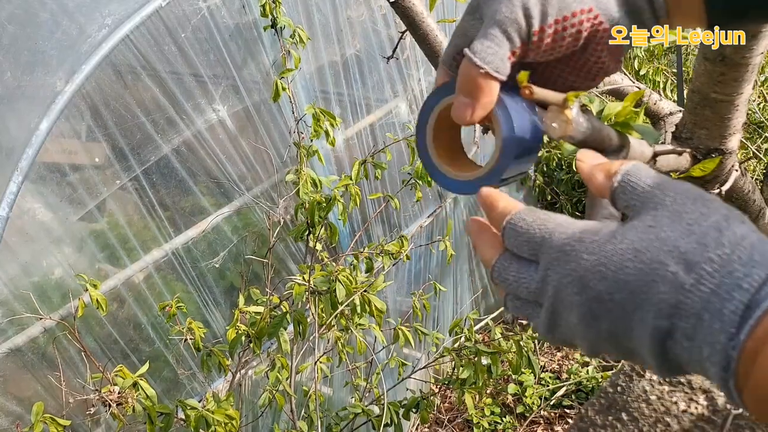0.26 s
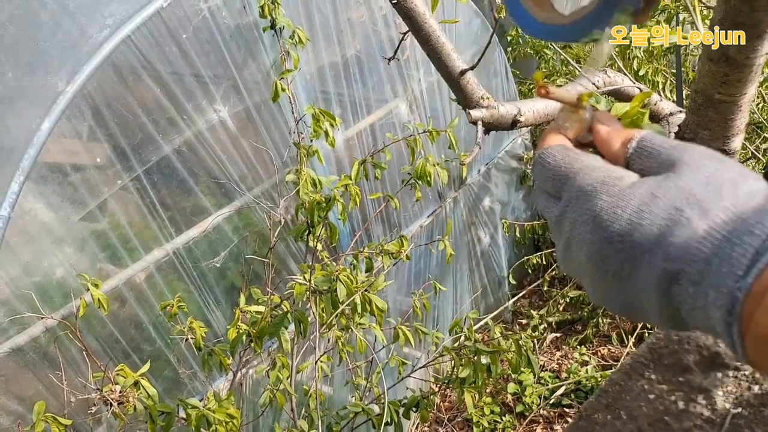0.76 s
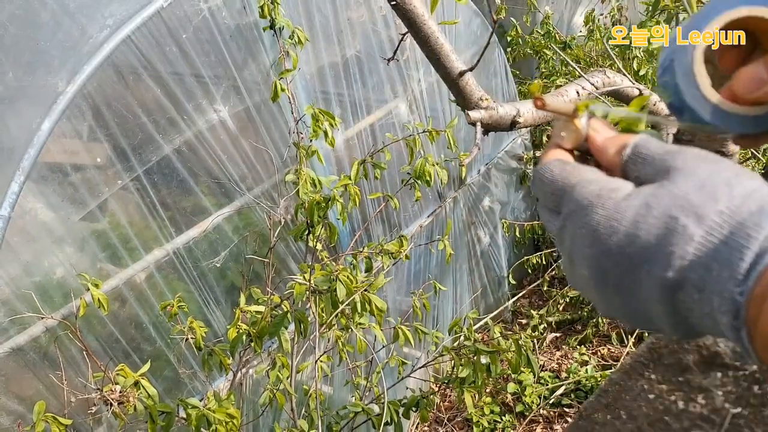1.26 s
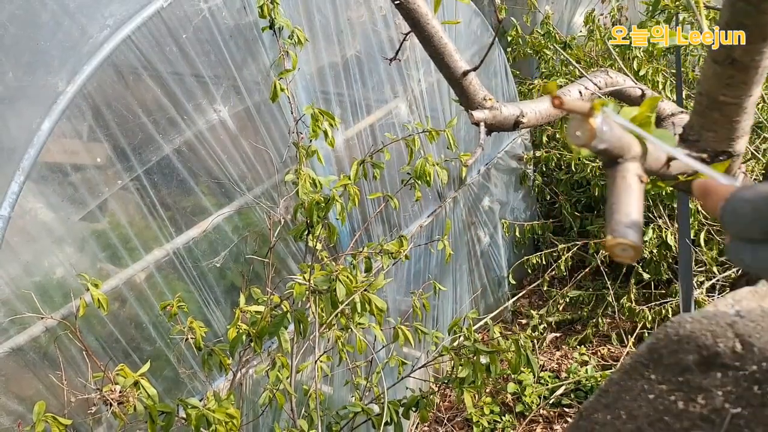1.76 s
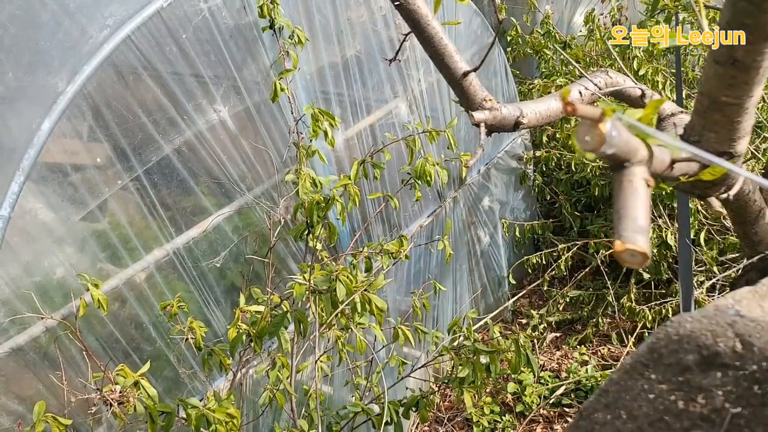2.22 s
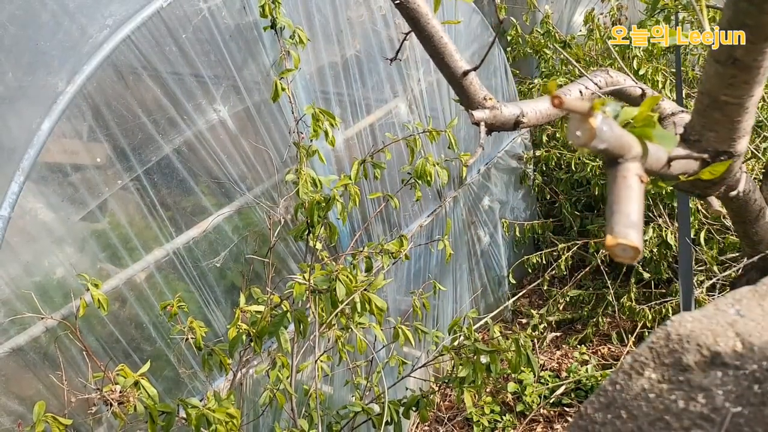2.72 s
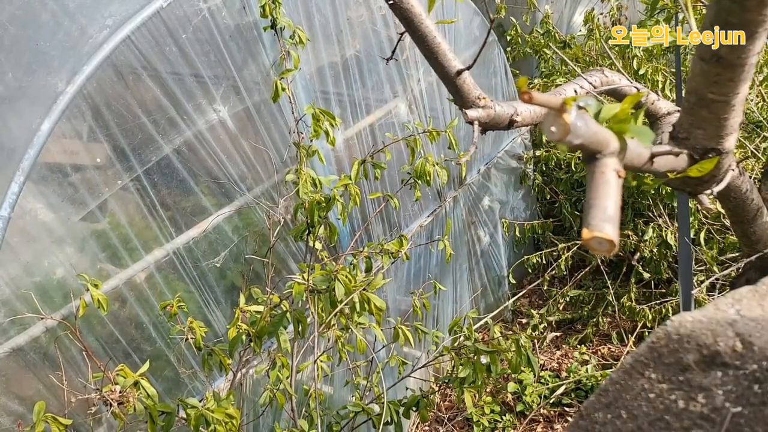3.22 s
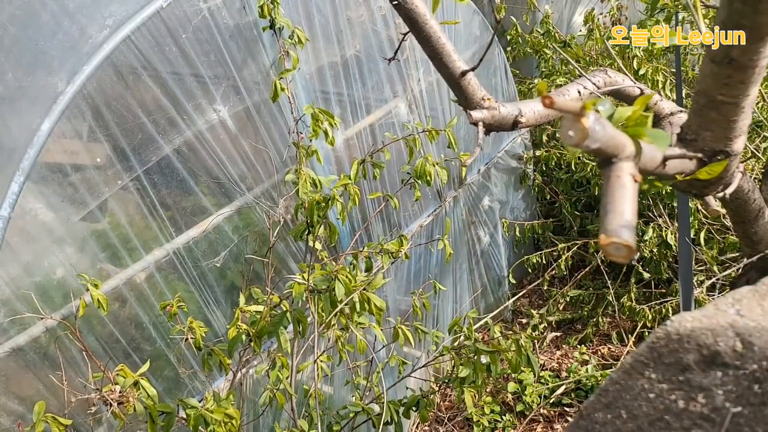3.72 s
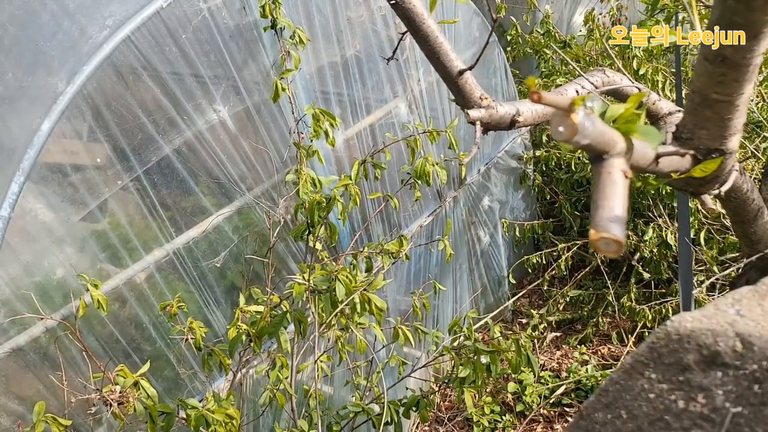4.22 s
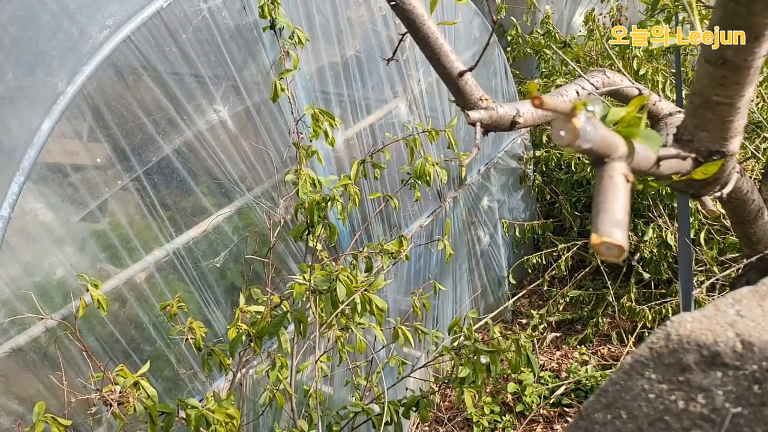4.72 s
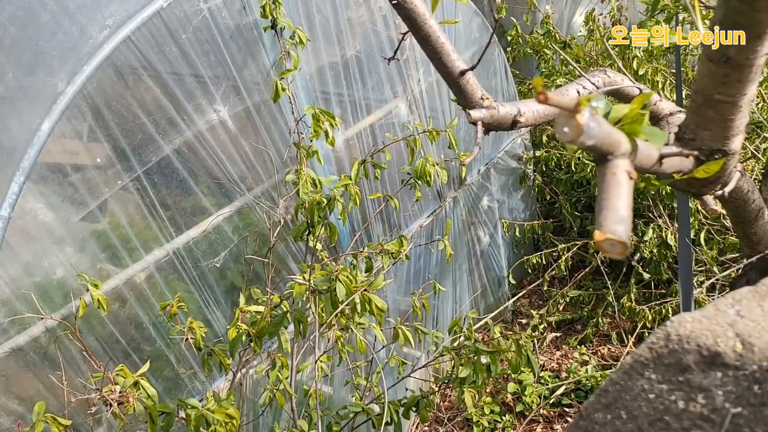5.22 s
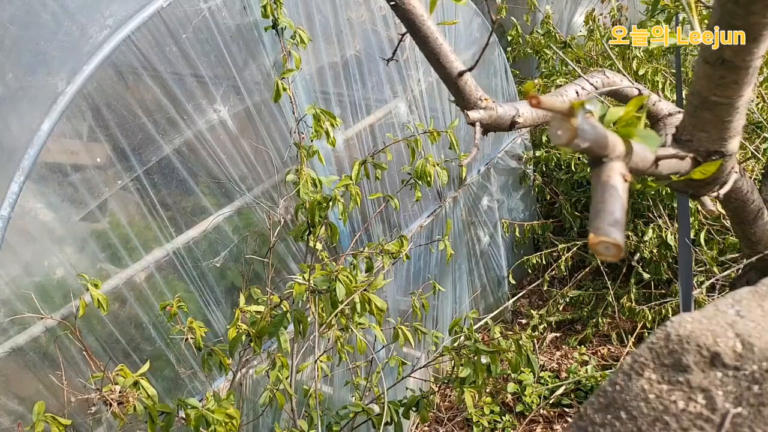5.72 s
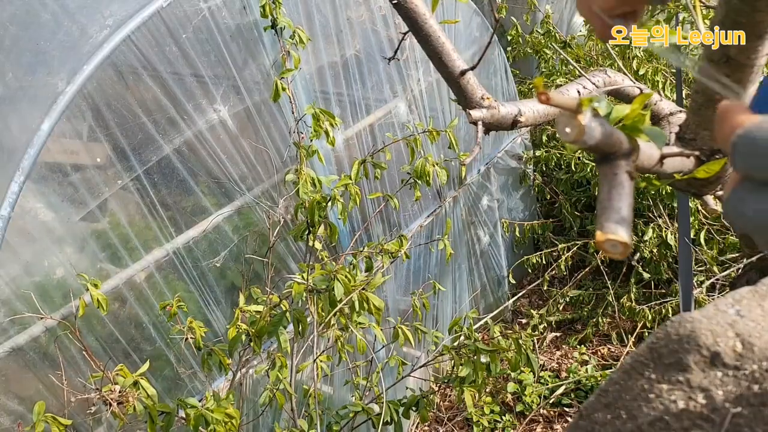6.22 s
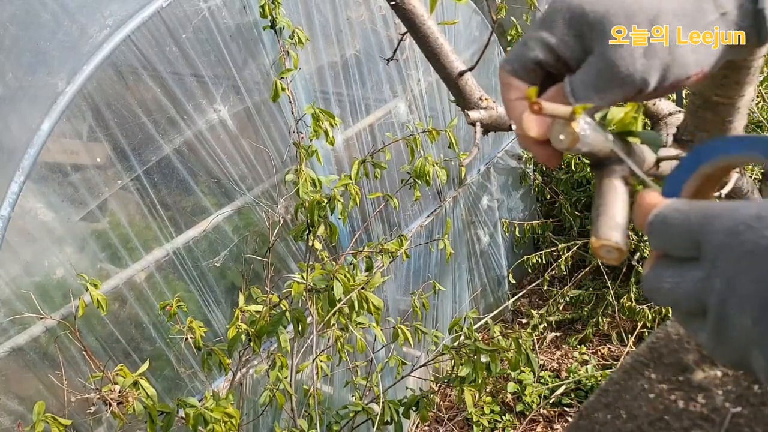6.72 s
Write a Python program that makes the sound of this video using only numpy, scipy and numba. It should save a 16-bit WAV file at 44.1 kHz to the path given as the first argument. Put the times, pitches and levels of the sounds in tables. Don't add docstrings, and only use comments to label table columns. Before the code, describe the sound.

Close to a stereo microphone, leaning right, sticky plastic tape is tugged off a roll: light rustles, springy plucks, then a longer crackling pull with falling pitch and crisp film ticks. A quiet stretch leaves faint rustles and birds over soft open air and distant low hum. A dense fast peel follows, ending in hollow cardboard taps and tiny crinkles.

```python
import sys
import numpy as np
from scipy import signal
from scipy.io import wavfile
from scipy.ndimage import uniform_filter1d, map_coordinates
from numba import njit

SR = 44100
rng = np.random.default_rng(int(sys.argv[2]) if len(sys.argv) > 2 else 0)


def decibels_to_gain(level_db):
    exponent = np.asarray(level_db, float) / 20
    return 10 ** exponent


def output_pcm(signal):
    pcm = np.clip(np.atleast_2d(signal).T, -1, 1) * 32767
    wavfile.write(sys.argv[1], SR, np.round(pcm).astype(np.int16))


N = 307377
LEAD_S = 0.006


def columns(table):
    seconds, *rest = np.transpose(table)
    return [np.interp(np.arange(N) / SR, seconds, column) for column in rest]


def unit(x):
    return x / np.sqrt(np.mean(x ** 2) + 1e-30)


def peak(x, db):
    return x * decibels_to_gain(db) / np.abs(x).max()


@njit
def svf(x, hz, width):
    y, b, l, g, last = np.empty(len(x)), 0., 0., 0., 0.
    for i in range(len(x)):
        if hz[i] != last:
            g, last = np.tan(np.pi * hz[i] / SR), hz[i]
        k = width[i] / last
        v = (b + g * (x[i] - l)) / (1 + g * (g + k))
        b, l, y[i] = 2 * v - b, l + 2 * g * v, k * v
    return y


def band(x, hz, width):
    one = np.ones(len(x))
    return svf(x + 1e-18, np.clip(hz * one, 15, 0.45 * SR), width * one)


def both(x, hz, width):
    return np.array([band(band(channel, hz, width), hz, 2 * width) for channel in x])


def above(x, hz):
    return signal.sosfilt(signal.butter(4, hz, "high", fs=SR, output="sos"), x)


def ring(x, hz, t60):
    pole = np.exp((2j * np.pi * hz - np.log(1000) / t60) / SR)
    return signal.lfilter([1], [1, -pole], x).imag


def walk(rate):
    hold = int(SR / rate)
    steps = np.repeat(rng.standard_normal(N // hold + 1), hold)
    return 1.25 * uniform_filter1d(uniform_filter1d(steps, hold), hold)[:N]


def pair(size, scatter_db, same=0.55):
    shared, left, right = rng.standard_normal((3, size))
    grain = decibels_to_gain(scatter_db * np.minimum(rng.exponential(size=size), 4))
    return grain * (np.sqrt(same) * shared + np.sqrt(1 - same) * np.array([left, right]))


def swell(start, end, start_db, end_db):
    size = int((end - start) * SR)
    return decibels_to_gain(np.linspace(start_db, end_db, size)) * signal.windows.tukey(size, min(1100 / size, 1))


def add(out, s, sound):
    i = int(s * SR)
    out[:, i:i + sound.shape[1]] += sound[:, :N - i]


def tear(size, rise_s, fall_s):
    t = np.arange(size) / SR - LEAD_S
    lead_in = np.exp(t / rise_s) + decibels_to_gain(-21) * np.exp(t / 0.003)
    settle = np.exp(-t / fall_s) + decibels_to_gain(-25) * np.exp(-t / 0.006)
    burst = pair(size, scatter_db=2.5, same=0.7) * np.where(t > 0, settle, lead_in)
    burst[:, int(LEAD_S * SR)] = decibels_to_gain(13)
    return burst


def slips():
    # start in seconds, peak level in dB, then strand level in dB against it,
    # roll resonance in Hz, crack level in dB against the peak.
    first_tug = [
        (0.627, -12.5, -18.5, 1079, -4),
        (0.6455, -17.5, -7.5, 950, 5.5),
    ]
    short_strand = [
        (0.785, -8.5, -11, 2170, -3),
        (0.807, -9, -11.5, 2200, -11.5),
        (0.83, -11, -8, 2200, -8.5),
        (0.847, -16.5, -8.5, 2317, -4.5),
    ]
    tight_strand = [
        (1.358, -14, -10, 2270, -2),
        (1.383, -7, -12.5, 2200, -9),
        (1.417, -8.5, -42, 1980, -9),
    ]
    let_go = [
        (2.599, -30.5, -24.5, 1860, 2.5),
        (2.6163, -28.5, -10, 2510, 18.3),
        (2.6167, -30, -28, 3500, 10.8),
        (2.6213, -17, -29, 3080, 2.9),
    ]
    long_strand = [(1.673, -13.5, -26.5, 1260, -16), (1.706, -11, -26, 1164, -11.5),
                   (1.731, -12, -34, 1180, -40), (1.7485, -32, -8, 1190, -1.5), (1.752, -33, -13, 1510, 5),
                   (1.763, -23, -30, 1090, -3.5), (1.776, -26, -12, 1030, -12),
                   (1.805, -20, -12, 1230, -2.5), (1.846, -15.5, -16.5, 1064, -8.5),
                   (1.878, -13.5, -23, 1296, -8.5), (1.894, -26, -21, 1150, -2),
                   (1.911, -19, -15, 1150, -9), (1.927, -16.5, -19.5, 1130, -9.5),
                   (1.95, -15.5, -20, 1160, -12.5), (1.9744, -14.5, -43, 1230, -7),
                   (2.001, -20, -37, 1140, -3.5)]
    last_pull = [(5.4957, -25, -32, 2500, -15), (5.5009, -22.5, -20, 2500, -33),
                 (5.5056, -13.5, -30, 1800, -27), (5.508, -10.5, -26, 1870, -36),
                 (5.511, -31, -36, 2670, -25), (5.535, -16, -41, 2680, -29), (5.556, -26.5, -18, 2800, -2),
                 (5.592, -24, -20, 2820, -14), (5.679, -26, -26, 2360, -12), (5.737, -24, -34, 3300, -13),
                 (5.748, -28, -35, 2600, -5), (5.756, -24, -25, 2200, -7), (5.773, -23.5, -28, 2020, -1),
                 (5.79, -21.5, -29, 1730, -6), (5.8, -32.5, -28, 2400, -13), (5.5404, -24, -14, 2600, -11),
                 (5.562, -29, -28, 2730, 3), (5.568, -13, -32, 2710, -16), (5.576, -15, -33, 2500, -33),
                 (5.63, -14, -32, 1580, -14), (5.643, -13.5, -32, 1900, -14), (5.66, -33, -24, 3000, -4),
                 (5.665, -14.5, -35, 2760, -18), (5.692, -24, -31, 2300, 0.5), (5.7002, -22, -23, 2060, -7),
                 (5.714, -23, -19, 2400, -10), (5.732, -24, -19.5, 3310, -11),
                 (5.765, -22, -22.5, 2500, -11), (5.783, -20.5, -30, 2000, -2.5),
                 (5.7835, -18.5, -27, 2210, 1), (5.794, -17, -39, 1940, -15),
                 (5.829, -32.5, -20, 2500, -12), (5.836, -27.5, -31.5, 2250, -10),
                 (6.031, -31.5, -57, 3090, -27)]
    bumps = [(1.4187, -20, -9.5, 856, -32.5), (2.168, -33, -19.5, 1150, -43),
             (2.616, -27, -11.5, 1340, -39.5), (5.862, -31, -26, 745, -41), (5.875, -26, -23, 750, -33),
             (5.904, -29.5, -31, 745, -34), (5.918, -42, -29, 740, -20), (6.357, -44, -4.5, 870, -33),
             (6.369, -42.5, -16, 986, -25), (6.38, -41, -18, 1000, -20), (6.398, -46, -5, 816, -35)]
    pulls = (first_tug, short_strand, tight_strand, let_go, long_strand, last_pull, bumps)
    # strand pitch at the first slip in Hz, growth of its length in shares per second,
    # ring time in seconds, level step from one overtone to the next in dB.
    pitches, growths = (869, 739.7, 1240, 1150, 629.4, 264, 374.3), (2.1, 0.35, 6.6, 4.1, 2.96, 1.06, 0.29)
    ring_times, overtone_steps = (0.036, 0.055, 0.028, 0.023, 0.053, 0.023, 0.0067), (-13.5, -2.2, -11.5, -22.5, -9, 2.5, 2)
    # roll resonance width as a share of its centre, crack centre in Hz,
    # strand level on the left in dB (it sounds mostly to the right).
    widths, crack_centres, left_levels = (0.32, 0.88, 1, 0.49, 0.54, 0.38, 0.23), (5000, 5000, 5000, 9500, 4000, 4000, 5000), (-3.5, -3, -2, -0.5, -21, -3,
                                                                                -8)
    # multiple of the lowest roll resonance, level in dB.
    roll_modes = [
        (1.002, 3.5),
        (1.648, 0),
        (2.4, -3.5),
        (3.5, -10.5),
    ]
    out = np.zeros((2, N))
    settings = zip(pulls, pitches, growths, ring_times, overtone_steps, widths, crack_centres, left_levels)
    for rows, first_hz, growth, ring_s, step_db, width, crack_hz, left_db in settings:
        for s, db, strand_db, roll_hz, crack_db in rows:
            strand_hz = first_hz / (1 + growth * (s - rows[0][0]))
            burst = tear(size=4400, rise_s=0.0003, fall_s=0.0013)
            strand = 0
            for k in range(3):
                hz = strand_hz * (k + 1) * 1.012 ** k
                tone = band(ring(burst[0], hz, ring_s / 1.2 ** k), hz, 0.49 * hz)
                strand = strand + peak(tone, step_db * k ** 1.1)
            lap = np.zeros(int(SR / strand_hz) + 1)
            lap[0], lap[-1] = 1, -0.34
            burst = signal.lfilter([1], lap, burst)
            roll = sum(decibels_to_gain(mode_db) * both(burst, k * roll_hz, width * roll_hz) for k, mode_db in roll_modes)
            crack = both(burst, crack_hz, width=18000)
            sound = peak(strand, db + strand_db) * decibels_to_gain(np.array([[left_db], [0]]))
            sound = sound + peak(roll, db - 6.5) + peak(crack, db + crack_db)
            add(out, s + 0.0012 - LEAD_S, above(sound, 0.34 * min(strand_hz, roll_hz)))
    return out


def crackle():
    # start and end in seconds, start and end level in dB, centre in Hz.
    peeling = [(0.478, 0.563, -70.5, -48, 4700), (0.634, 0.694, -71, -64, 2980),
               (0.843, 0.903, -44, -80, 3020), (1.412, 1.514, -59, -82, 2740), (1.731, 1.8, -46, -45, 2100),
               (1.998, 2.043, -67, -96, 2900), (2.408, 2.465, -81, -46, 3320),
               (5.424, 5.51, -77.5, -54.5, 3600), (5.502, 5.61, -42.5, -39, 2370),
               (5.6, 5.687, -55, -43.5, 2030), (5.684, 5.794, -44.5, -41, 2500),
               (5.795, 5.86, -55, -58.5, 2290), (5.861, 5.961, -62.5, -71.5, 1954),
               (5.948, 5.993, -62, -76.5, 2297), (2.59, 2.618, -56.5, -47, 4000),
               (0.58, 0.626, -74, -68, 4000), (1.656, 1.73, -71, -68, 2500), (6.002, 6.1, -68.5, -71, 2410)]
    rubbing = [(0.033, 0.103, -65, -68, 7900), (0.198, 0.274, -64.5, -62, 4870),
               (0.402, 0.501, -65, -75, 4570), (1.283, 1.364, -70, -49, 8800),
               (2.17, 2.233, -88, -73, 5200), (2.636, 2.717, -77, -82, 6300),
               (3.463, 3.486, -80, -73, 6160), (3.611, 3.673, -89.5, -77, 4510),
               (3.769, 3.899, -98, -51, 7200), (3.938, 3.99, -69.5, -48, 3186),
               (3.778, 4.085, -70, -82.5, 2480), (4.763, 4.779, -77.5, -81, 6130),
               (5.176, 5.206, -83.5, -74, 6000), (5.356, 5.433, -58.5, -72.5, 5200),
               (6.597, 6.706, -74, -78, 5000)]
    # start and end in seconds, start and end level in dB,
    # start pitch in Hz.
    strand_hum = [(0.22, 0.271, -56.5, -64, 2030), (0.402, 0.436, -57, -63, 2000),
                  (0.463, 0.533, -66.5, -56, 1680), (0.525, 0.594, -47, -64, 1215),
                  (1.734, 1.809, -50.5, -50, 477), (5.514, 5.619, -49.5, -62.5, 450),
                  (5.549, 5.627, -42.5, -42.5, 1520), (5.688, 5.804, -44.5, -43, 1680),
                  (5.692, 5.816, -61.5, -58, 348), (5.861, 5.935, -51, -51.5, 251),
                  (5.862, 5.895, -51, -48.5, 773), (6.358, 6.409, -71, -68.5, 497),
                  (5.912, 5.934, -41, -55.5, 798)]
    # start and end in seconds, start and end level in dB, pitch in Hz.
    after_ring = [
        (0.864, 0.957, -60, -68, 735),
        (0.866, .95, -65, -72, 2260),
    ]
    out = np.zeros((2, N))
    clusters = decibels_to_gain(3 * walk(450) + 1.2 * walk(110))
    for start, end, start_db, end_db, hz in peeling + rubbing:
        top_db = np.clip(14 * np.log2(hz / 5200), -11, 4)
        level = swell(start, end, start_db, end_db)
        grains = pair(len(level), scatter_db=4.5) * clusters[int(start * SR):][:len(level)]
        film = both(grains, hz, 0.95 * hz) + decibels_to_gain(-9) * both(grains, hz=5900, width=1800)
        top = above(both(grains, hz=12000, width=12000), hz=7000)
        add(out, start, level * (unit(above(film, 0.49 * hz)) + decibels_to_gain(top_db) * unit(top)))
    for start, end, start_db, end_db, start_hz in strand_hum:
        level = swell(start, end, start_db, end_db)
        hz = start_hz / (1 + 1.96 * np.arange(len(level)) / SR)
        grains = pair(len(level), scatter_db=-0.5)
        add(out, start, level * unit(both(grains, hz, 0.21 * hz)))
    for start, end, start_db, end_db, hz in after_ring:
        level = swell(start, end, start_db, end_db)
        grains = pair(len(level), scatter_db=-4.5)
        add(out, start, level * unit(both(grains, hz, 0.04 * hz)))
    return out


def ticks():
    # start in seconds, peak level in dB, centre in Hz.
    creases = [(0.1658, -43, 2840), (0.216, -28.5, 4060), (0.2536, -38, 4830), (0.282, -43, 4020),
               (0.4104, -30, 5670), (0.4288, -42, 4020), (0.4495, -53, 3500), (0.47, -42, 6000),
               (0.487, -48, 4500), (0.533, -32.5, 5000), (0.546, -32, 6000), (5.886, -44, 5500),
               (5.906, -44, 4010), (0.2218, -39, 7500), (0.5538, -25.5, 3830), (0.5708, -26.5, 8400),
               (2.118, -40, 5000), (2.14, -29, 5500), (2.145, -30, 4260), (2.158, -16, 5070),
               (2.4546, -46, 5940), (2.7245, -46.5, 3930), (3.434, -53, 5430), (3.7536, -37.5, 7850),
               (3.7765, -39.5, 6000), (3.825, -42, 7000), (3.9583, -41, 3560), (3.971, -34, 3200),
               (4.0694, -48, 6000), (5.1897, -47, 3540), (5.373, -35, 5570), (5.877, -30.5, 5200),
               (6.0734, -35, 3160), (6.093, -48.5, 3570), (6.2028, -39, 2700)]
    flicks = [(0.95, -56, 2500), (0.975, -54, 2680), (2.13, -33.5, 5100), (2.149, -23, 2640),
              (2.172, -13, 6150), (2.426, -46, 3080), (2.589, -47, 6000), (2.71, -41.5, 2500),
              (2.794, -52.5, 5000), (3.1992, -54, 5960), (3.659, -53, 3330), (3.808, -52, 2680),
              (3.842, -39, 7100), (3.85, -43, 7340), (3.864, -36.5, 6720), (3.874, -28.5, 7500),
              (3.8891, -26, 4550), (3.9712, -31, 6000), (4.0098, -39, 7160), (4.018, -43, 6900),
              (4.057, -47, 4580), (4.689, -58, 3730), (4.888, -41, 6940), (5.357, -34, 5870),
              (5.434, -41.5, 5900), (6.185, -50, 5720), (6.3895, -36.5, 6500), (6.42, -49.5, 4200),
              (6.771, -46.5, 5650), (6.8498, -43, 8100),
              (6.372, -52, 6000),
        (6.399, -41.5, 6000),
        (6.541, -43.5, 5000),
        (6.617, -68, 7000),
        (6.636, -55, 6100),
        (6.656, -43, 5950),
        (6.679, -50.5, 7160),
        (6.775, -47.5, 7430),
        (6.845, -44, 7560),
        (6.893, -47, 8000),
    ]
    out = np.zeros((2, N))
    for rows, top_db in ((creases, -14.5), (flicks, -6.5)):
        for s, db, hz in rows:
            burst = above(tear(size=2000, rise_s=0.0007, fall_s=0.001), hz=1500)
            body = both(burst, hz, 1.2 * hz)
            top = both(burst, hz=12000, width=10000)
            add(out, s + 0.00016 - LEAD_S, peak(body, db - 8) + peak(top, db + top_db))
    return out


def taps():
    # start in seconds, peak level in dB.
    hits = [
        (5.9349, -21.5),
        (5.9378, -24.5),
        (5.9438, -10),
        (5.9468, -13),
        (5.9494, -27.5),
        (5.9592, -46.5),
    ]
    # core resonance in Hz, level in dB, ring time in seconds.
    core_modes = [
        (1400, -17.5, .014),
        (2200, 3.5, 0.005),
        (2600, -2.5, 0.0045),
        (3450, -11, 0.0073),
        (6000, -5, 0.0096),
        (10600, -11, 0.0071),
    ]
    out = np.zeros((2, N))
    for s, db in hits:
        push = tear(size=3000, rise_s=0.0005, fall_s=0.002) * decibels_to_gain(-30)
        push[:, int(LEAD_S * SR):][:, :13] -= np.hanning(15)[1:-1]
        core = sum(decibels_to_gain(mode_db) * ring(push, hz, t60) for hz, mode_db, t60 in core_modes)
        add(out, s - LEAD_S, peak(above(core, hz=950), db))
    return out


def whistles():
    # start in seconds, level in dB, length in seconds, tuning factor, hoarseness from 0 to 1.
    calls = [
        (1.039, -48, 0.1, 1.035, .02),
        (4.267, -48.5, 0.1, 1.04, 0),
        (6.179, -50, 0.11, 1.03, 0.5),
    ]
    # share of its length, gliding voice in Hz, its level in dB, steady voice in Hz,
    # its level in dB, trill from 0 to 1.
    course = [
        (0, 3750, -30, 5000, -34, .05),
        (.06, 3800, -11, 5000, -17, .05),
        (.24, 4450, -10, 5050, -15, .15),
        (.33, 4400, -7, 4950, -16, .8),
        (.47, 4050, 1.5, 4850, -18, .95),
        (.57, 3550, -9, 4800, -14, .7),
        (.76, 3400, -5, 4750, -15, .95),
        (.82, 2550, -11, 4700, -26, .4),
        (.96, 2350, -12, 4700, -30, .3),
        (1.001, 2350, -30, 4700, -40, .1),
    ]
    out = np.zeros((2, N))
    for s, db, length, tuning, hoarse in calls:
        share = np.arange(int(length * SR)) / (length * SR)
        at, *shape = np.transpose(course)
        glide_hz, glide_db, steady_hz, steady_db, trill = (np.interp(share, at, c) for c in shape)
        trill = np.maximum(trill, hoarse)
        wobble = unit(band(rng.standard_normal(len(share)), hz=429, width=110))
        glide = 2 * np.pi * np.cumsum(tuning * glide_hz * (1 + 0.075 * trill * wobble)) / SR
        steady = 2 * np.pi * np.cumsum(steady_hz * (1 + 0.018 * (0.3 + trill) * wobble)) / SR
        halves = decibels_to_gain(-13.5) * (np.sin(glide / 2) + np.sin(steady / 2) + np.sin(steady + steady / 2))
        upper_tone = decibels_to_gain(-0.5) * np.sin(steady + steady / 4 + (0.7 + 0.94 * trill) * wobble)
        voice = decibels_to_gain(glide_db) * np.sin(glide) + decibels_to_gain(steady_db) * (np.sin(steady) + halves + upper_tone)
        voice = decibels_to_gain(db) * voice
        add(out, s, np.tile(voice, (2, 1)))
        add(out, s + 0.092, decibels_to_gain(-14.5) * both([voice, voice], hz=4550, width=700))
    return out


def sparrow():
    # start in seconds, level in dB, length in seconds, beak tuning factor, hoarseness (1 is fully trilled).
    calls = [
        (0.09, -63.5, 0.057, 1.14, 1.44),
        (0.65, -66, 0.054, 0.7, 0.94),
        (2.305, -66, 0.052, 0.93, 0.26),
        (5.04, -65, 0.052, 1.14, 1.35),
        (6.846, -68.5, 0.049, 0.79, 1.1),
    ]
    # share of its length, pitch in Hz, beak resonance in Hz, level in dB, trill from 0 to 1.
    course = [
        (0, 1255, 3300, -28, 0.1),
        (.1, 1240, 3270, 0.5, 0.4),
        (0.26, 1400, 3700, 0, 0.1),
        (0.47, 1367, 3600, 6, 1),
        (0.72, 1184, 2950, 11, .9),
        (.9, 1200, 2155, 5, 1),
        (1.001, 1110, 1950, -33, 0.4),
    ]
    out = np.zeros((2, N))
    for s, db, length, tuning, hoarse in calls:
        share = np.arange(int(length * SR)) / (length * SR)
        at, *shape = np.transpose(course)
        hz, beak_hz, level_db, trill = (np.interp(share, at, c) for c in shape)
        trill = np.maximum(trill, hoarse)
        rough = unit(band(rng.standard_normal(len(share)), hz=212, width=33))
        wobble = np.sin(2 * np.pi * 85 * length * share) + 1.1 * rough
        phase = 2 * np.pi * np.cumsum(hz * (1 + 0.053 * trill * wobble)) / SR
        stack = sum(np.sin(k * phase) for k in range(2, 11))
        voice = both([stack], tuning * beak_hz, width=1900)[0]
        voice = voice + decibels_to_gain(-18.5) * both([stack], hz=4100, width=1800)[0]
        add(out, s, np.tile(voice * decibels_to_gain(level_db + db + trill * wobble), (2, 1)))
    return out


def air():
    # pitch in Hz, level in dB per Hz.
    colour = [(25, -14.5), (42, -2.5), (65, -5), (92, 3.5), (125, -10.5), (200, -11), (310, -17.5),
              (420, -12.5), (720, -16), (1300, -19.5), (2700, -31), (3500, -38.5), (7800, -47.5),
              (8600, -49.5), (16000, -43)]
    # pitch in Hz, likeness of left and right from -1 to 1.
    likeness = [(30, 0.53), (70, .92), (130, 1), (290, .36), (640, -0.51), (1400, -0.64), (3100, 0.07),
                (9000, 0.54)]
    # time in seconds, level of the hum in dB.
    hum_swell = [(0.0, -59.5), (0.97, -62), (2.43, -59.5), (2.77, -57.5), (3.36, -58.5), (4.23, -60.5),
                 (4.58, -58), (4.91, -61), (6.97, -56.5)]
    # time in seconds, level of the air in dB.
    gust = [(0, 0.5), (1.0, 0.5), (2.3, 0), (3.0, 0.5), (3.7, 0.5), (4.3, 0.5), (5.0, -2), (6.2, -2),
            (6.97, -3.5)]
    colour_hz, colour_db = np.transpose(colour)
    like_hz, like_share = np.transpose(likeness)
    (hum_db,), (gust_db,) = columns(hum_swell), columns(gust)
    leaves = walk(20)
    out = 0
    for hz in 24 * 2 ** np.arange(0, 9.45, 1 / 4):
        mid, side = (band(band(rng.standard_normal(N), hz, 0.4 * hz), hz, 0.4 * hz) for _ in range(2))
        like = np.clip(np.interp(np.log(hz), np.log(like_hz), like_share), -1, 1)
        db = np.interp(np.log(hz), np.log(colour_hz), colour_db) + 2.4 * walk(8.5)
        db = db + gust_db * np.clip(3000 / hz, 0, 1)
        db = db + (hum_db - hum_db.mean()) * np.clip(90 / hz, 0, 2.5)
        db = db - 2 * (leaves - 1) * np.clip(hz / 8000, 0, 1)
        spread = np.sqrt(1 - like) * side * np.array([[1], [-1]])
        out = out + decibels_to_gain(db) * (np.sqrt(1 + like) * mid + spread)
    return unit(out) * decibels_to_gain(-52.5)


def surroundings(x, t60, db):
    t = np.arange(9000) / SR
    tail = both(rng.standard_normal((2, len(t))), hz=2500, width=33000) * decibels_to_gain(db - 60 * t / t60)
    return x + signal.fftconvolve(x, tail, axes=1)[:, :N]


def scene():
    # time in seconds, lag of the left microphone in ms, left minus right in dB.
    hands = [(0, .07, -4), (.65, .045, -2.5), (.78, .07, -5.3), (.86, .12, -4.5), (1.3, .6, -2.9),
             (1.4, .55, -2.8), (1.41, .14, 0), (1.66, .135, -4.2), (2.18, .185, -3), (2.45, .34, -2.4),
             (2.58, .115, -3), (3.8, .3, -4), (5.4, .335, -3.5), (5.8, .345, -3), (5.93, .385, -.8),
             (6.2, .36, -3), (6.38, .07, 0), (6.97, .07, 0)]
    lag_ms, pan_db = columns(hands)
    tape = (slips() + taps() + ticks() + crackle()) * decibels_to_gain(np.array([pan_db, -pan_db]) / 2 + 8.5)
    tape[0] = map_coordinates(tape[0], [np.arange(N) - lag_ms * SR / 1000], order=3)
    bird = sparrow() + whistles()
    bird[1] = np.roll(bird[1], int(0.0004 * SR)) * decibels_to_gain(-1.4)
    return surroundings(tape, t60=0.13, db=-46.5) + surroundings(bird, t60=0.26, db=-21.5) + air()


def roll_off(x):
    return signal.sosfilt(signal.butter(12, 17150, fs=SR, output="sos"), x)


def record(dry):
    high = signal.sosfiltfilt(signal.butter(8, 8200, "high", fs=SR, output="sos"), dry)
    shelved = dry - (1 - decibels_to_gain(-7)) * high
    mix = signal.sosfilt(signal.ellip(6, 0.3, 22, 15850, fs=SR, output="sos"), shelved)
    return roll_off(mix)


dry = scene()
out = record(dry)
output_pcm(out)
```